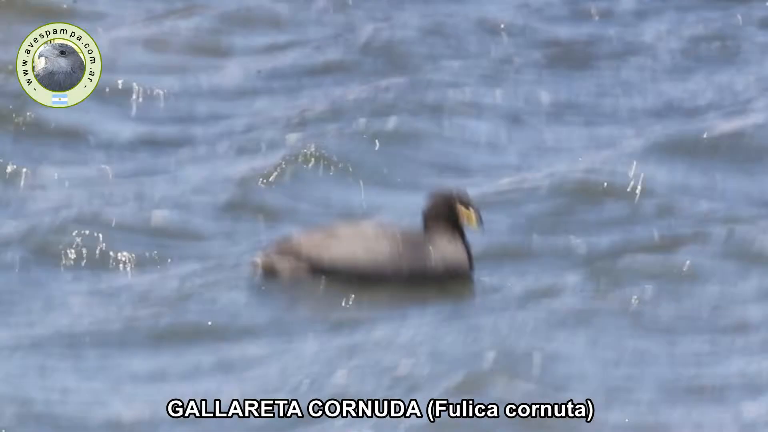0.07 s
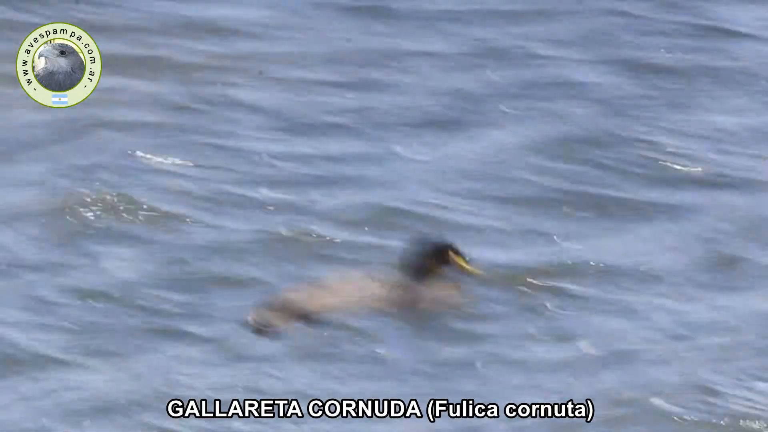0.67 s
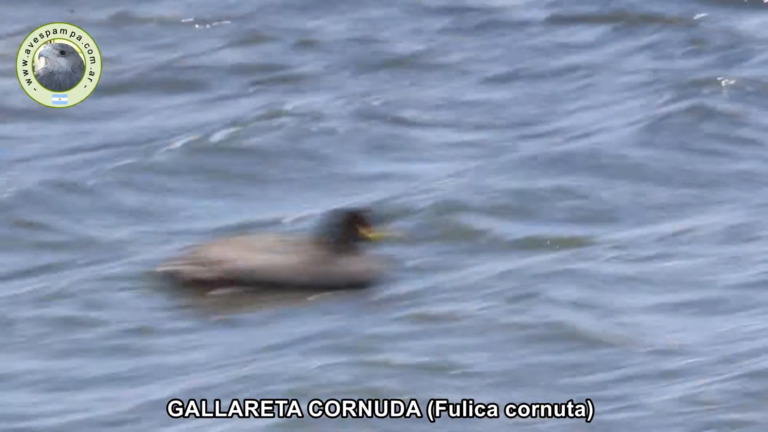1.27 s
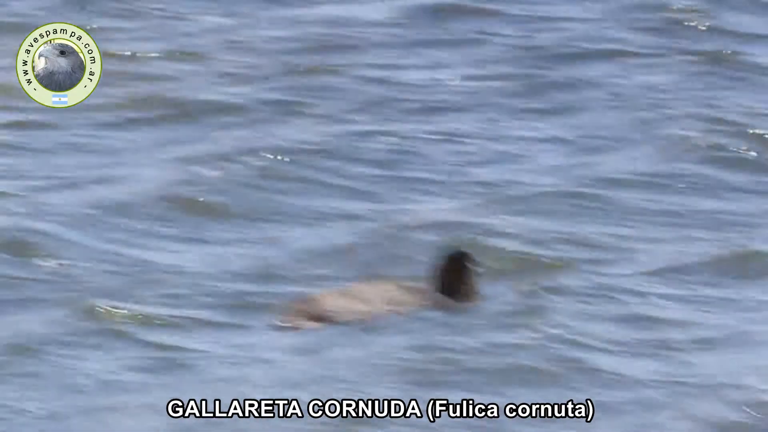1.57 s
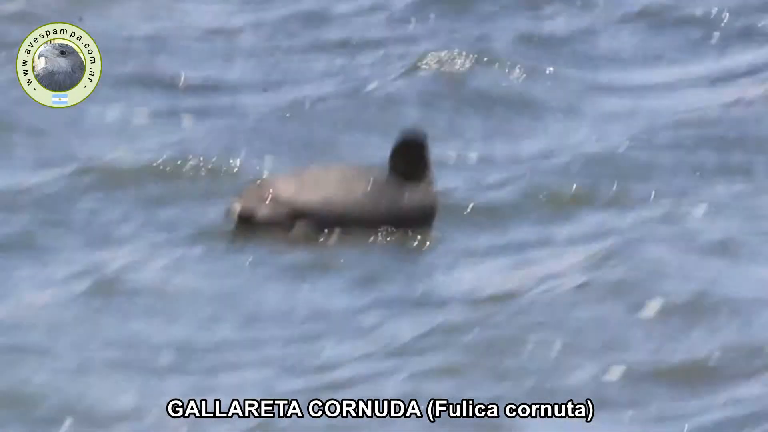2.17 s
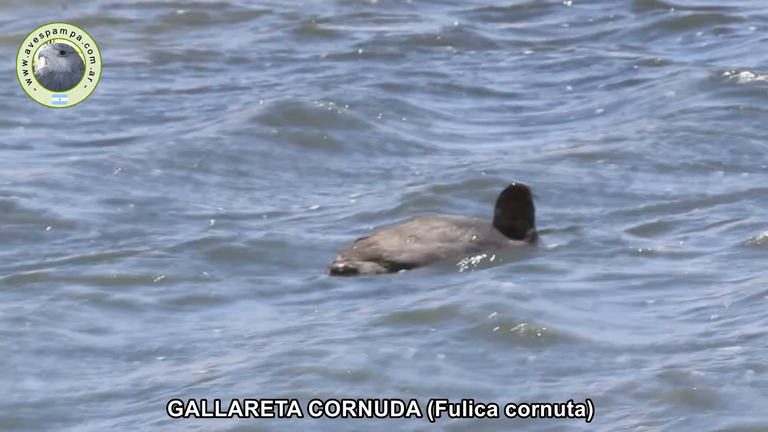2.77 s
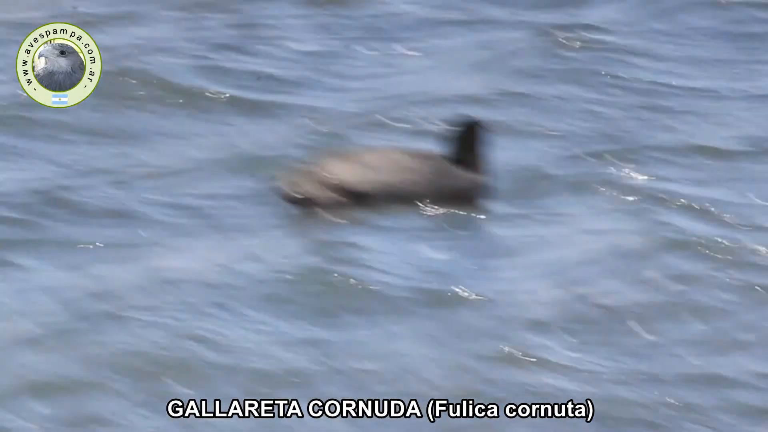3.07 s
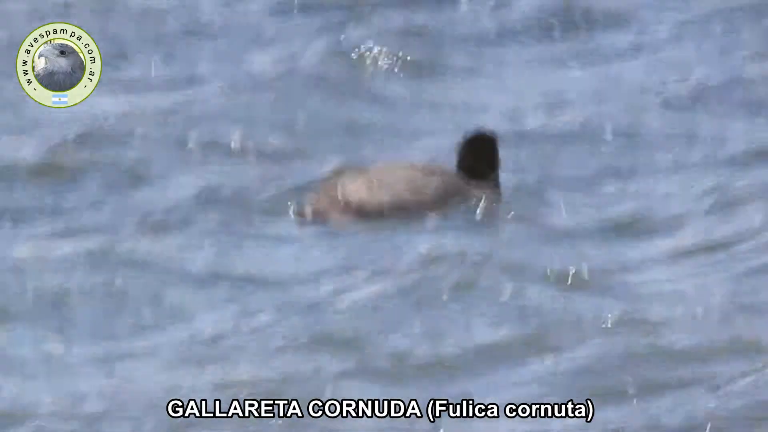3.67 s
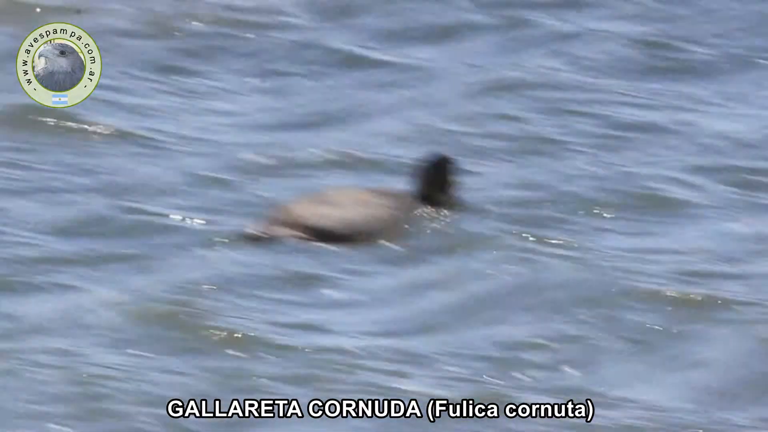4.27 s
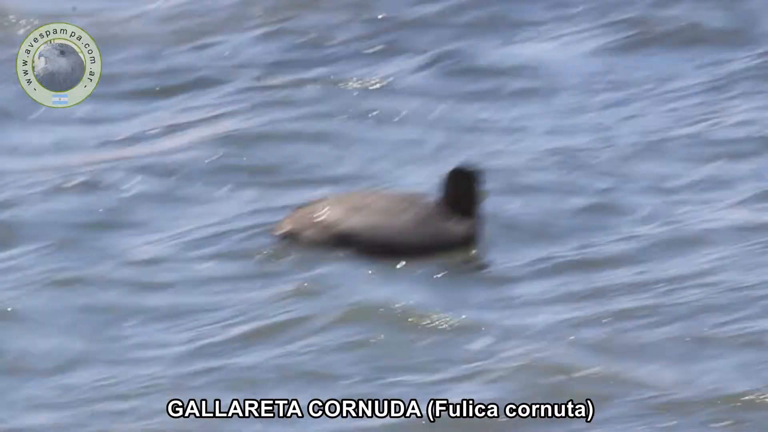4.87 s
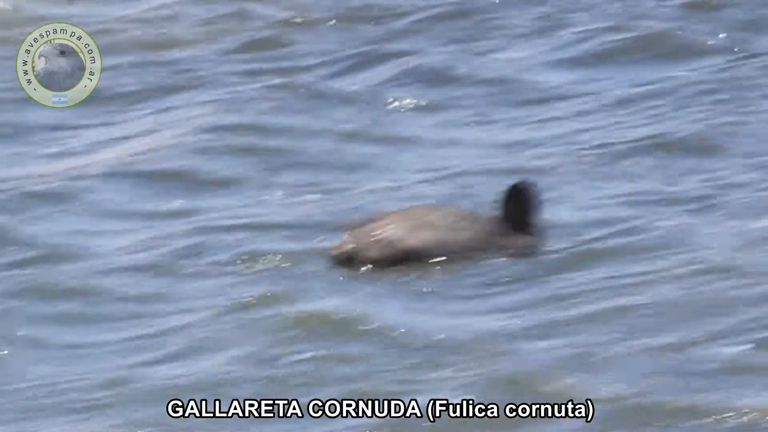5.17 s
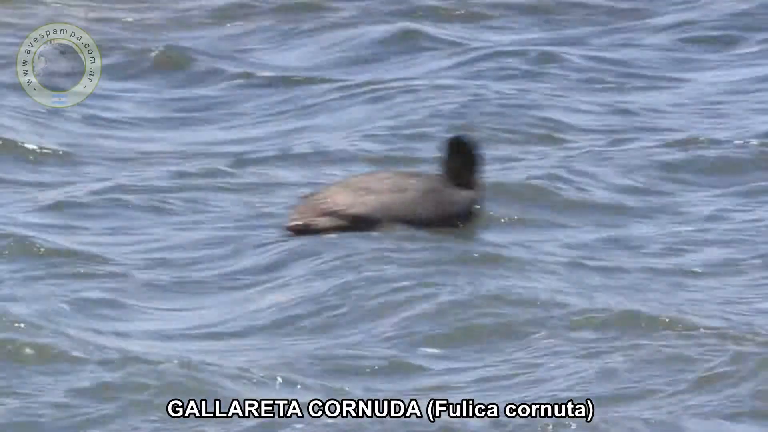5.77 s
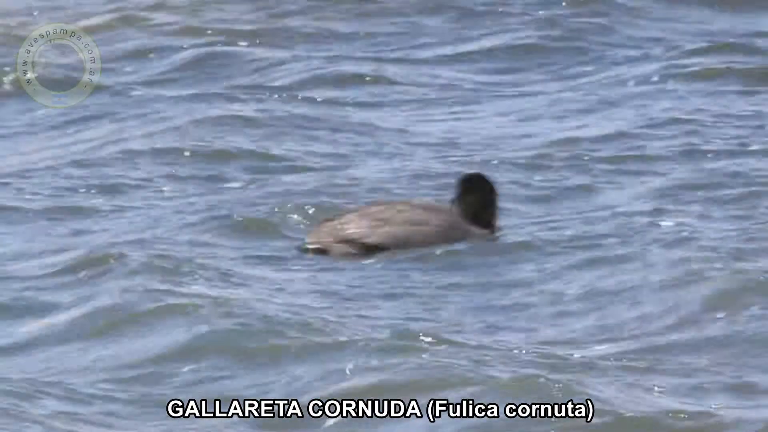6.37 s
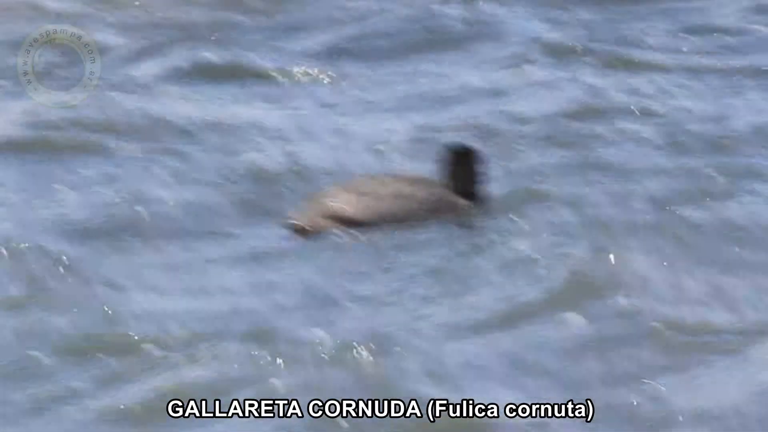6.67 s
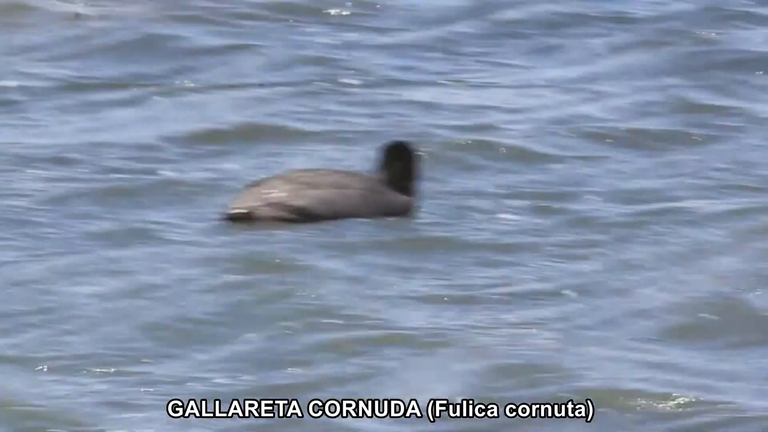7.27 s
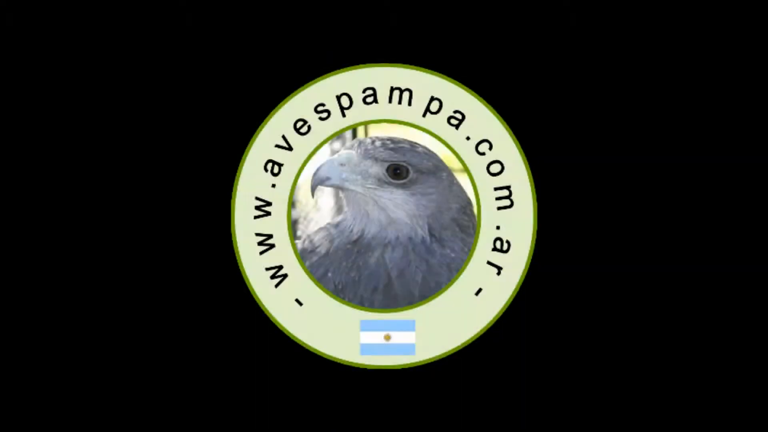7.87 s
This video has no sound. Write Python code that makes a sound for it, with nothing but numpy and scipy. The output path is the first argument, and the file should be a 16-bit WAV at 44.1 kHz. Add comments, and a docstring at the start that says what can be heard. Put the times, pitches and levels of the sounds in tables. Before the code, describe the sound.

Strong wind buffets a microphone outdoors beside a choppy lake, making a close, rasping roar. Each gust overloads the microphone and crackles, with brief hissing spits and occasional hard thumps. A faint wash of water and a thin whistle that comes and goes sit far behind. The roar flutters unevenly for about seven seconds, then cuts off abruptly.

```python
"""A rasping roar comes first: strong wind over a choppy lake buffets a camera microphone. Turbulent pressure
clips the capsule, so every gust crackles, and a high-pass wind filter thins the deepest bass. Water washes
behind it, shearing air spits at the port, a faint whistle comes and goes, and big eddies slam the capsule. The
roar stutters, short slices being heard twice, until the sound is cut off abruptly."""
import sys
import numpy as np
from scipy.fft import rfft, irfft, next_fast_len
from scipy.io import wavfile
from scipy.ndimage import uniform_filter1d, map_coordinates

SR = 44100
rng = np.random.default_rng(int(sys.argv[2]) if len(sys.argv) > 2 else 0)


def persist_wave(psi):
    """Save psi, clipped to +-1, as 16-bit WAV."""
    counts = np.round(np.clip(psi, -1, 1) * 32767).astype(np.int16)
    wavfile.write(sys.argv[1], SR, np.atleast_2d(counts).T)


N = 348831

# pressure spectrum of the eddies at the mean air speed: frequency_hz, relative_db
EDDY_SPECTRUM = [(15, -11), (50, -3), (110, -2), (165, -3), (220, -0.5), (330, -6.5), (500, -14.5),
                 (900, -27.5), (2000, -51.5), (5000, -90)]
# nominal rate at which eddies pass the port, steering the roar's pitch: time_s, rate_hz
EDDY_RATE = [(.1, 222.4), (.22, 261.8), (.4, 243.4), (.8, 215.1), (1.25, 260.4), (1.37, 180.1),
             (1.5, 234.8), (1.7, 218), (1.81, 310.7), (1.9, 182.3), (2.25, 208), (2.72, 255.6),
             (2.9, 205.1), (3.25, 172), (3.5, 209.7), (3.82, 164.8), (4.1, 212), (4.4, 208.3),
             (4.68, 262.1), (5.17, 262.3), (5.25, 180.1), (5.4, 254.7), (5.6, 220.1), (5.78, 245.2),
             (5.9, 205.5), (6.05, 244.8), (6.3, 217.7), (6.65, 252.3), (6.95, 249.5), (7.15, 222.2),
             (7.3, 253.8)]
# hiss of air shearing at the port's edge: frequency_hz, relative_db
SHEAR_SPECTRUM = [(200, -18), (600, 4), (1100, 10), (1900, -0.5), (2800, -9), (4000, -22.5), (5500, -35),
                  (8000, -53.5), (13000, -74)]
# grazing incidence, half added to the hiss and half taken off the eddies' force: time_s, grazing_db
GRAZING = [(0, -1), (1, -0.5), (2.2, -1.2), (2.8, -0.5), (3.3, -1.5), (3.8, -2), (4.3, 1.7), (5, 1.7),
           (5.7, 3), (6.3, -1.4), (6.7, 1.8), (7.3, 3.5)]
# level changes in gusts: start_s, length_s, rasp_db, boom_db, spitting_db
GUSTS = [(0.178, .38, 4.2, 0.61, -3.5), (0.554, .18, 7, 0, 0), (0.872, .09, 6.5, 0.5, 0),
         (1.05, .141, 6, 0, 4.5), (1.195, 0.182, 1, -1, 5), (1.511, .34, 3, 1, 2),
         (2.213, .11, 2, 1.16, -10), (2.537, .21, 0, 1.33, -3), (2.746, .135, 4, 2.5, -6),
         (2.881, .1, -.5, 1.19, -1), (2.986, .1, 6.5, 0.66, 0), (3.24, .22, 3.5, 2.5, -7),
         (3.458, .1, 4, 1, 4), (3.877, .09, 0, 1.5, -6), (3.962, .134, 3.5, 1.33, 7.5),
         (4.537, 0.1377, 1.5, 0, -10), (4.674, .09, 4.5, 2, -2), (4.99, .21, 5, .5, 1.5),
         (5.585, .105, 4, 3, 2.5), (5.687, .185, 6, 0.71, 0), (6.212, 0.099, 3, 1, 6),
         (6.427, .048, 5, 0, 9), (6.535, .344, 6.5, 0, -0.5), (6.883, .216, 7, -.5, -0.5),
         (7.24, .11, 9.5, 0.3, 9.5)]
# level changes in lulls: start_s, length_s, rasp_db, boom_db, spitting_db
LULLS = [(0.036, 0.1484, -2, -1.5, -8), (0.748, .1, -2, -2, 0), (0.97, .076, -3, -2, 15.5),
         (1.391, .112, -5, -2.5, 2.5), (1.861, .34, -3, -0.23, 3.5), (3.099, 0.1154, -5.5, -4, -1.5),
         (3.61, 0.055, -1.5, -1.5, 0), (3.76, 0.1103, -4.5, 0, 6.5), (4.107, .07, -4, -1, 1),
         (4.9, 0.0795, -4, -2.5, -6), (5.31, .06, -1, -2, -1), (5.444, .075, -4, -1, 3.5),
         (6.14, .05, -1, -1.65, 5), (7.1, 0.1303, -.5, -3.5, 5)]
# hard jets of air that rattle the capsule between its stops: time_s, rise_db, fall_s
JETS = [(0.062, 6.5, .004), (.182, 1.5, .012), (0.937, 4.5, 0.0094), (1.001, 9, 0.0082), (1.057, 4.5, 0.01),
        (1.162, 4, 0.0094), (1.45, 6.5, 0.0087), (1.62, 7.5, 0.005), (1.678, 7.5, 0.006),
        (1.733, 7.5, 0.0076), (1.781, 5.5, 0.0085), (1.819, 3.5, 0.0065), (2.995, 4, 0.0079),
        (3.016, 5, 0.0059), (3.035, 4, 0.0079), (3.056, 5, 0.0053), (3.357, 3, 0.004), (3.459, 4, 0.0036),
        (3.5, 5.5, 0.0035), (3.596, 7.5, 0.0034), (4.007, 5.5, 0.0067), (4.063, 6, 0.0064),
        (4.684, 5, 0.0032), (4.74, 6, 0.012), (4.998, 5.5, 0.0062), (5.102, 6, 0.017), (5.165, 6.5, 0.014),
        (5.6, 3.5, 0.0028), (5.636, 3.5, 0.0049), (5.707, 2, .006), (5.762, 2.5, 0.015), (5.818, 3, 0.0028),
        (5.861, 3, .003), (6.134, 5.5, 0.0024), (6.796, 4.5, 0.0099), (6.901, 4, 0.0045),
        (6.937, 4.5, 0.0039), (6.959, 4.5, 0.0051), (6.994, 6, 0.0072), (7.248, 3.5, .003)]
# small fast eddies inside a jet: frequency_hz, relative_db
JET_SPECTRUM = [(150, -21.5), (400, -0.5), (800, -3), (1300, -19.5), (3000, -49.5), (6000, -85)]
# wash of the choppy water: frequency_hz, relative_db
WASH_SPECTRUM = [(100, -9), (600, 6), (1400, -5), (2500, -21.5), (5000, -17.5), (8000, -29), (13000, -43)]
# mean level of the wash: time_s, level_db
WASH_LEVEL = [(6.6, -46), (7.1, -56.5)]
# loudest spits of shearing air: time_s, half_width_s, relative_db, sizzle_over_core_db
SPITS = [(.43, 0.0016, -22.5, -15), (.483, .0015, -23, -12), (0.566, 0.003, -27, -12.5),
         (.593, 0.0026, -20, -14), (.641, 0.0018, -26.5, -6.5), (0.695, 0.0035, -27, -10),
         (.899, 0.0017, -26, -23), (0.937, .007, -26.5, -14), (1.123, 0.0027, -28.5, -15),
         (1.176, 0.0025, -23.5, -11), (2.766, 0.0058, -22, -23), (2.828, 0.0061, -21.5, -23),
         (3.072, .0015, -32, -14), (3.311, 0.0015, -25, -28), (3.368, .0012, -26, -31),
         (3.43, 0.0017, -25.5, -21), (3.541, .005, -29, -19), (4.54, 0.0014, -24.5, -19),
         (4.745, 0.0049, -31, -12), (5.112, 0.0095, -30, -10), (5.176, 0.01, -30, -12),
         (5.709, .003, -23.5, -17), (5.769, 0.0059, -24.5, -14), (5.819, 0.0018, -22.5, -14),
         (5.863, 0.0015, -22, -16), (6.237, .004, -28, -23), (6.29, 0.0034, -29, -23),
         (6.464, 0.0018, -22.5, -12), (6.57, .002, -21, -15), (6.626, .002, -22.5, -12),
         (6.68, .004, -23.5, -10.5), (6.708, 0.0012, -21.5, -12), (6.75, .0015, -23, -14),
         (6.822, 0.0015, -25.5, -19.5), (6.86, 0.0019, -25.5, -22), (6.893, 0.0014, -24.5, -23.5),
         (6.901, 0.0012, -24.5, -7), (6.909, 0.00084, -23, -8), (6.943, .003, -23, -5.5),
         (6.958, 0.0013, -24.5, -7), (7.002, 0.0027, -25, -3.5), (7.031, 0.0017, -23.5, -11),
         (7.07, 0.0013, -23, -10.5), (7.16, 0.0012, -27, -9), (7.247, .0015, -20.5, -12.5),
         (7.305, 0.027, -30, -7)]
# chirping core of a spit: frequency_hz, relative_db
CORE_SPECTRUM = [(400, -14.5), (800, 3), (1250, 1), (1900, .5), (2700, -3), (3500, -12.5), (4500, -35.5),
                 (7000, -58.5)]
# sizzle above that core: frequency_hz, relative_db
SIZZLE_SPECTRUM = [(1500, -29), (3000, 6.5), (4200, 2), (5800, -7.5), (8000, -20.5), (13000, -27.5)]
# swell and fade of the whistle: time_s, level_db
WHISTLE_LEVEL = [(0, -59.5), (1.2, -44), (2.0, -46), (2.5, -48.5), (3.3, -46), (4.1, -48.5), (4.8, -58)]
# throws of the capsule from stop to stop, before filtering: time_s, swing_db
SLAMS = [(1.657, -7), (1.712, -6), (2.781, -5), (2.844, -3.5), (3.356, -8), (3.412, -5.5), (4.793, -9.5),
         (4.86, -10), (4.997, -4), (5.024, -6.5), (5.072, -9), (5.098, -6.5), (5.161, -9), (6.845, -9)]

END_S = 7.343
BOOM_DB, RASP_DB = -15.5, -32.5  # low and high bands of the roar between gusts
ONSET_S, RELEASE_S = 0.0077, .016  # edges of a gust or lull
FLUTTER_PER_S, RASP_FLUTTER_DB, BOOM_FLUTTER_DB = 42, 1.35, 0.56
MEAN_EDDY_HZ, EDDY_FOLLOW = 212.36, 0.9  # rate at the mean air speed; exponent tying pitch to rate
STALL_S, STALL_DEPTH = .009, 0.38  # the air stalls this long before a jet, by this share of its rise
FIRST_REPEAT_S, REPEAT_EVERY_S, REPEAT_LENGTH_S, REPEAT_SCATTER_S = .118, .11203, .049, .0095
SLAM_SWING_S, SLAM_HOLD_S, SLAM_PIN = 0.0002, 0.0023, .75  # crossing, dwell, share of the roar shut out
CUT_HZ, CUT_DAMPING = 107.6, 1.26  # wind-cut filter
SLAM_TOP_HZ, TOP_HZ = 5500, 13000  # low-pass corners of a slam and of the whole sound


def amp(db):
    """The decibel law: amplitude grows tenfold every 20 dB."""
    return 10 ** (np.asarray(db) / 20)


def unit(x):
    """Normalisation to rms 1."""
    return x / np.sqrt(np.mean(x ** 2) + 1e-20)


def curve(rows):
    """Linear interpolation of (time_s, value) points at every sample."""
    return np.interp(np.arange(N) / SR, *np.transpose(rows))


def wobble(rate):
    """Smooth random modulation: a spline through rate knots a second."""
    return map_coordinates(rng.standard_normal(N // 20), [np.arange(N) * rate / SR], mode="wrap")


def filtered(x, response):
    """Linear filtering: the spectrum is multiplied by a frequency response."""
    size = next_fast_len(N + SR // 2)
    return irfft(rfft(x, size) * response(np.fft.rfftfreq(size, 1 / SR)), size)[:N]


def noise(spectrum):
    """Spectral shaping of white noise, scaled to rms 1."""
    hz, db = np.transpose(spectrum)
    return unit(filtered(rng.standard_normal(N), lambda f: amp(np.interp(np.log(f + 1), np.log(hz), db))))


def steady(x, span_s):
    """Envelope flattening: division by the running rms."""
    size = max(int(span_s * SR), 2)
    return x / np.sqrt(np.abs(uniform_filter1d(uniform_filter1d(x ** 2, size), size)) + 1e-12)


def swept_eddies(speed):
    """Frozen turbulence: a fixed pattern drifts past, so faster air raises all its frequencies."""
    return map_coordinates(noise(EDDY_SPECTRUM), [np.cumsum(speed)], mode="mirror")


def overload(pressure):
    """Hard clipping: the capsule stops dead at +-1, and each corner of the wave clicks."""
    return np.clip(pressure, -1, 1)


def wind_cut(x):
    """Second-order high-pass filtering: each flat top sags back to zero."""
    return filtered(x, lambda f: -f ** 2 / (CUT_HZ ** 2 - f ** 2 + 1j * CUT_DAMPING * CUT_HZ * f))


def buffeting():
    """Turbulent pressure saturates the capsule: big eddies pin it, fast ones spit and rasp."""
    gust_db, push_db, spitting_db = gusts_and_lulls()
    jet_db = jets(attack_s=0.004)
    grazing_db = curve(GRAZING)
    boom_db = BOOM_DB + push_db + 0.31 * jet_db
    rasp_db = RASP_DB + gust_db + jet_db
    gust_db, push_db = gust_db - np.mean(gust_db), push_db - np.mean(push_db)
    lurch_db = 1.55 * wobble(rate=70) + 1.35 * wobble(rate=230)
    speed = (curve(EDDY_RATE) / MEAN_EDDY_HZ) ** EDDY_FOLLOW
    speed *= amp(.12 * (gust_db - .7 * push_db) + lurch_db)
    # short slices of the fine texture are heard twice, all layers together
    eddies, shear, lurch_db, flutter, flicker = stutter(np.array(
        [swept_eddies(speed), noise(SHEAR_SPECTRUM), lurch_db, wobble(FLUTTER_PER_S), wobble(rate=380)]))
    force_db = 0.24 + 0.088 * gust_db + 0.59 * push_db + 0.22 * lurch_db - .5 * grazing_db
    rattle = amp(-3.5) * (amp(jet_db) - 1) * steady(noise(JET_SPECTRUM), span_s=0.0081)
    clipped = overload(amp(force_db) * steady(eddies, span_s=.05) + rattle)
    # shear hiss comes in brief spits, mostly shut out while the capsule is pinned
    spit_db = 13 * np.tanh(0.7 * flicker + 0.13 * lurch_db - .45) + spitting_db
    hiss_db = np.minimum(-23.0 + 0.98 * gust_db - .5 * push_db + .5 * grazing_db + spit_db, -12)
    hiss = amp(hiss_db) * shear * (1 - 1.17 * clipped ** 4)
    capsule = wind_cut(clipped + hiss)
    # the round swings boom, their sharp corners rasp
    boom = filtered(capsule, lambda f: 1 / (1 + (f / 680) ** 4))
    rasp = filtered(capsule - boom, lambda f: 1 / np.sqrt(1 + (f / 11500) ** 4))
    return (amp(boom_db + BOOM_FLUTTER_DB * flutter) * steady(boom, span_s=0.052)
            + amp(rasp_db + RASP_FLUTTER_DB * flutter) * steady(rasp, span_s=0.034))


def water():
    """Incoherent addition: many small waves merge into a noisy wash, quieter towards the end."""
    return amp(curve(WASH_LEVEL) + 1.1 * wobble(rate=7.6)) * noise(WASH_SPECTRUM)


def gusts_and_lulls():
    """Amplitude modulation by unsteady wind: trapezoids of rasp, boom and spitting, in dB."""
    t, total_db = np.arange(N) / SR, np.zeros((3, N))
    for start_s, length_s, *change_db in GUSTS + LULLS:
        ramp = np.minimum((t - start_s) / ONSET_S, (start_s + length_s - t) / RELEASE_S)
        total_db += np.outer(change_db, np.clip(ramp + .5, 0, 1))
    return total_db


def jets(attack_s):
    """Intermittency: the air stalls briefly, then a jet rises above the gust; the change in dB."""
    change_db = np.zeros(N)
    for time_s, rise_db, fall_s in JETS:
        here = np.arange(max(int(time_s * SR) - SR // 20, 0), int(time_s * SR) + SR // 20)
        t = here / SR - time_s
        stall = STALL_DEPTH * np.exp(-.5 * ((t + STALL_S) / attack_s) ** 2)
        surge = np.exp(-.5 * (t / np.where(t < 0, attack_s, fall_s)) ** 2)
        change_db[here] += rise_db * (surge - stall)
    return change_db


def stutter(x):
    """Periodic delay: on a strict beat the preceding moment repeats, with equal-power crossfades."""
    out, margin = x.copy(), SR // 200
    for start_s in np.arange(FIRST_REPEAT_S, END_S, REPEAT_EVERY_S):
        length_s = rng.normal(REPEAT_LENGTH_S, REPEAT_SCATTER_S)
        length_s = np.clip(length_s, REPEAT_LENGTH_S / 2, 2 * REPEAT_LENGTH_S)
        first, count = int(start_s * SR), int(length_s * SR)
        here = np.arange(first - margin, first + count + margin)
        blend = np.pi / 2 * np.clip(np.minimum(here - here[0], here[-1] - here) / (2 * margin), 0, 1)
        out[:, here] = np.cos(blend) * x[:, here] + np.sin(blend) * x[:, here - count]
    return out


def spits():
    """Shear noise at the port: a brief burst chirps, a long one rips, a sizzling one cracks."""
    core = steady(noise(CORE_SPECTRUM), span_s=0.0014)
    sizzle = steady(noise(SIZZLE_SPECTRUM), span_s=0.0022)
    out = np.zeros(N)
    for time_s, half_width_s, relative_db, sizzle_db in SPITS:
        here = np.arange(int(time_s * SR) - SR // 10, int(time_s * SR) + SR // 10)
        burst = np.exp(-.5 * ((here / SR - time_s) / half_width_s) ** 2)
        out[here] += amp(relative_db) * burst * (core[here] + amp(sizzle_db) * sizzle[here])
    return amp(1.5) * out


def whistle(pitch_hz=1408, half_width_hz=20):
    """Flow-excited resonance: wind across a narrow gap sings in a thin band of noise."""
    tone = filtered(rng.standard_normal(N), lambda f: 1 / (1 + ((f - pitch_hz) / half_width_hz) ** 2))
    return amp(curve(WHISTLE_LEVEL)) * unit(tone)


def with_slams(roar):
    """Limited travel: an eddy pins the capsule, choking the roar, then throws it to the other stop."""
    swing, free = np.zeros(N), np.ones(N)
    for time_s, swing_db in SLAMS:
        here = np.arange(int(time_s * SR) - SR // 20, int(time_s * SR) + SR // 20)
        t = here / SR - time_s
        crossing = 1 - 2 * np.exp(np.minimum(t, 0) / SLAM_SWING_S)
        swing[here] += amp(swing_db) * crossing * np.exp(-(t / SLAM_HOLD_S) ** 2)
        free[here] *= 1 - SLAM_PIN * np.exp(-(t / SLAM_HOLD_S + .5) ** 2)
    thuds = filtered(wind_cut(swing), lambda f: 1 / np.sqrt(1 + (f / SLAM_TOP_HZ) ** 2))
    return free * roar + thuds


def scene():
    """Superposition of wind, whistle and water up to the cut, where a faint rumble dies away."""
    t = np.arange(N) / SR
    gate = np.clip((END_S - t) / .002, 0, 1)
    rumble = amp(-49 - 520 * np.abs(t - END_S)) * noise(EDDY_SPECTRUM)
    mix = with_slams(buffeting()) + spits() + whistle() + water()
    return (gate * mix + rumble)[None]


def record(dry):
    """Band limiting: the camera's steep low-pass removes the highest treble."""
    return filtered(dry[0], lambda f: 1 / np.sqrt(1 + (f / TOP_HZ) ** 80))[None]


dry = scene()
out = record(dry)
persist_wave(out)
```